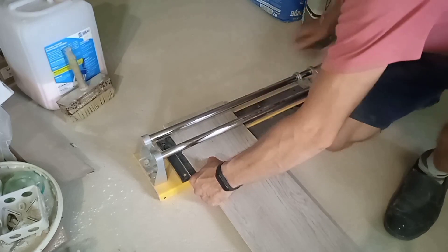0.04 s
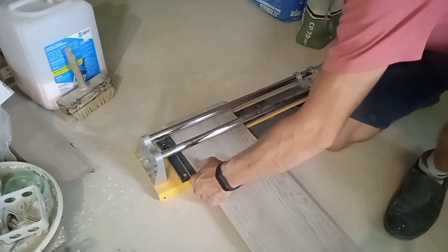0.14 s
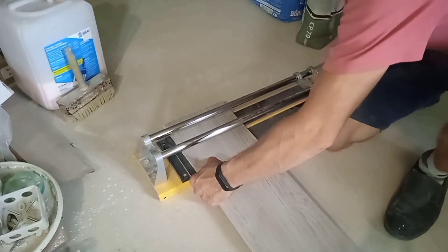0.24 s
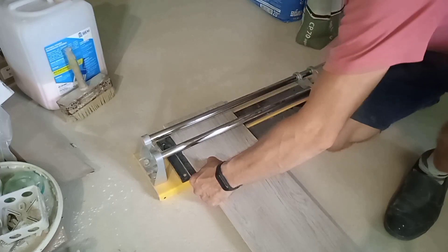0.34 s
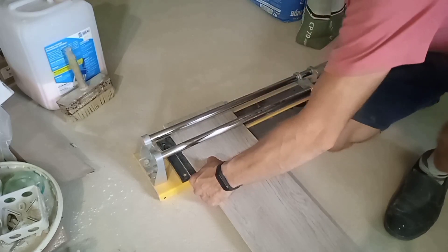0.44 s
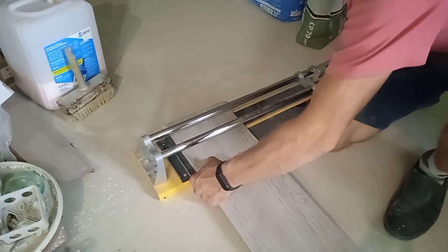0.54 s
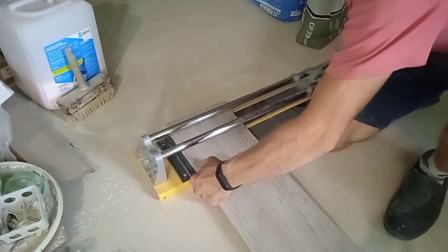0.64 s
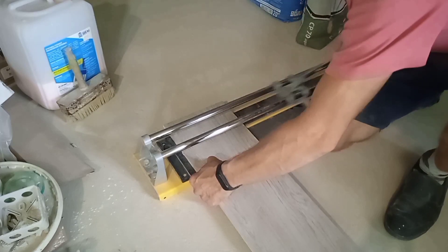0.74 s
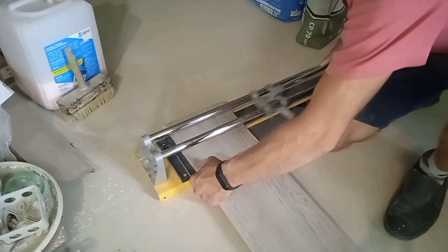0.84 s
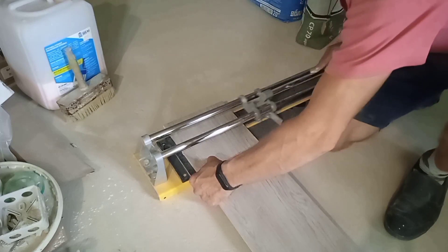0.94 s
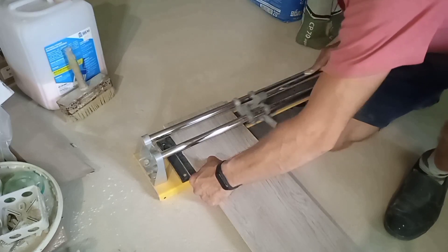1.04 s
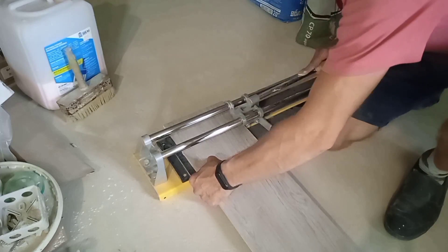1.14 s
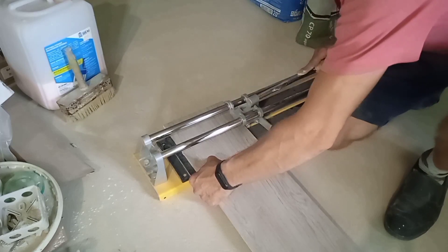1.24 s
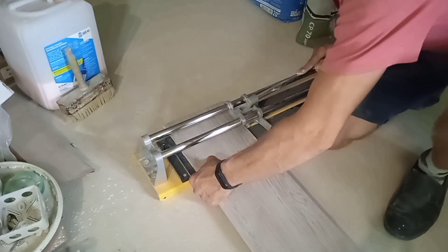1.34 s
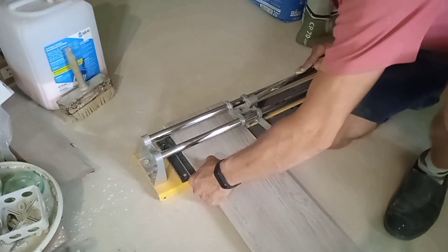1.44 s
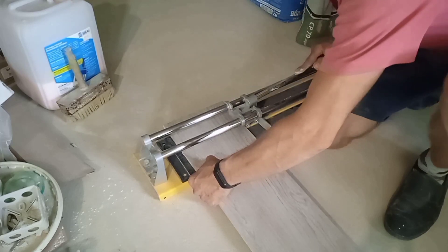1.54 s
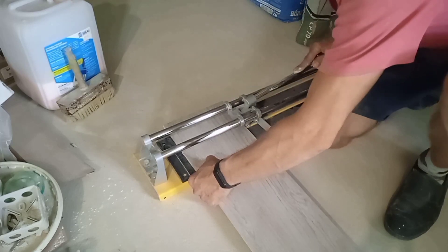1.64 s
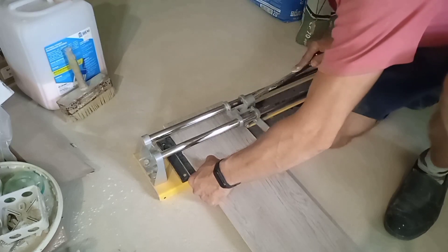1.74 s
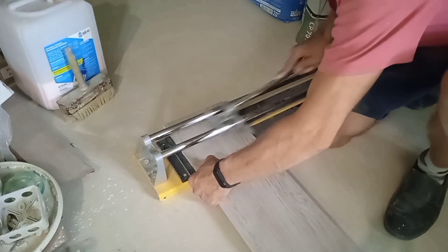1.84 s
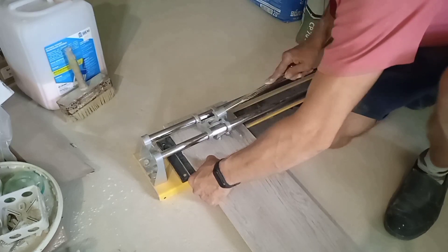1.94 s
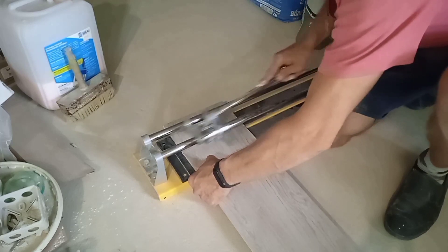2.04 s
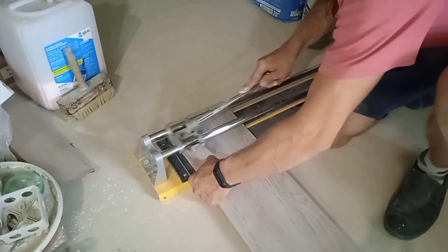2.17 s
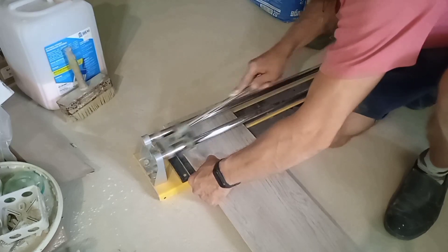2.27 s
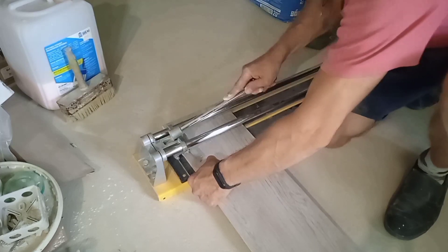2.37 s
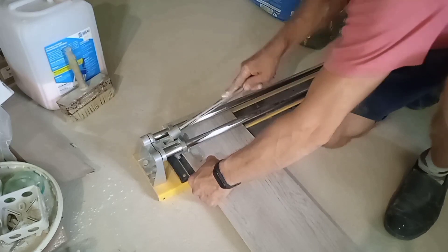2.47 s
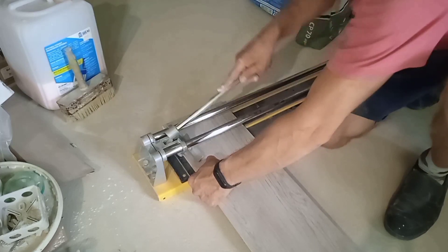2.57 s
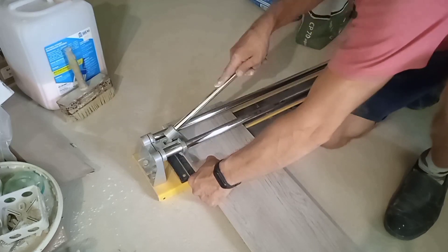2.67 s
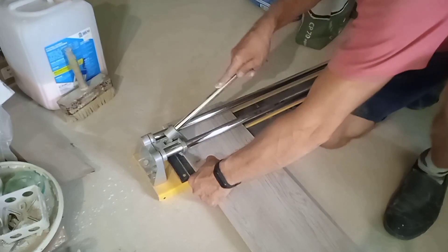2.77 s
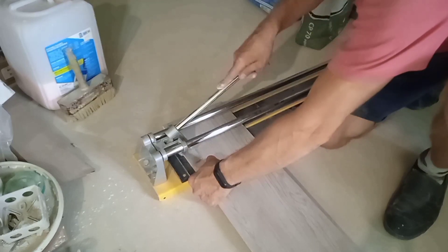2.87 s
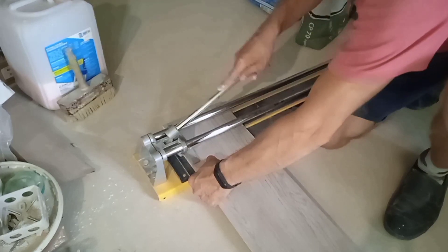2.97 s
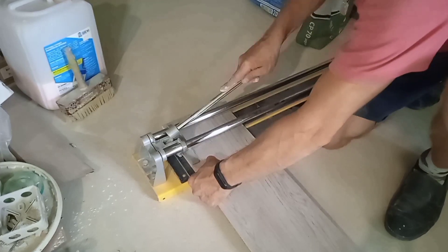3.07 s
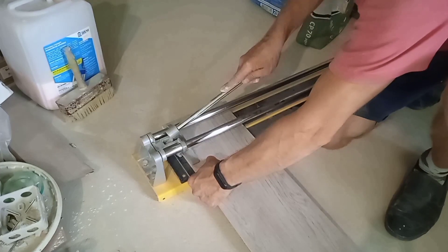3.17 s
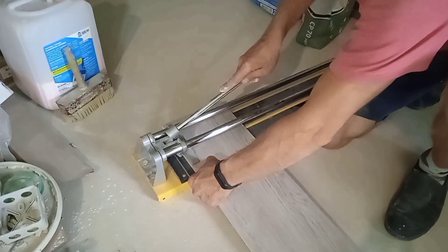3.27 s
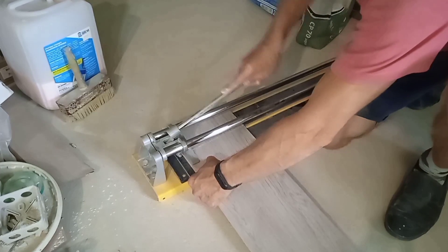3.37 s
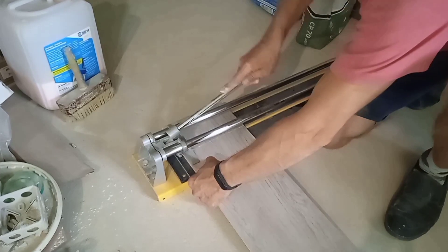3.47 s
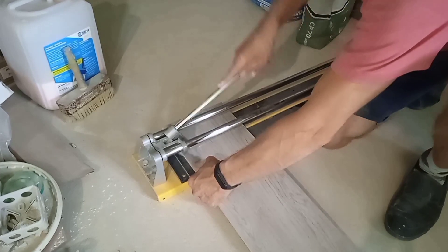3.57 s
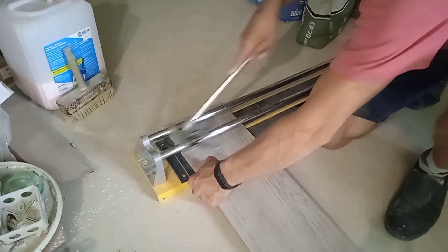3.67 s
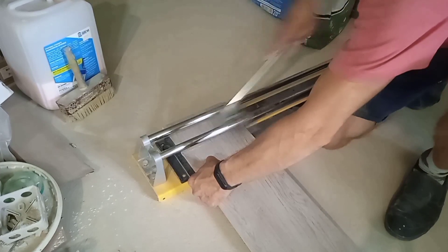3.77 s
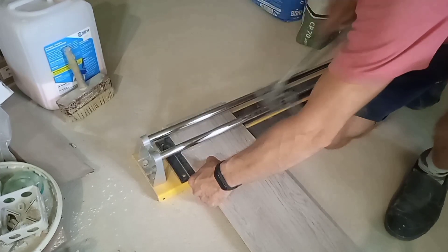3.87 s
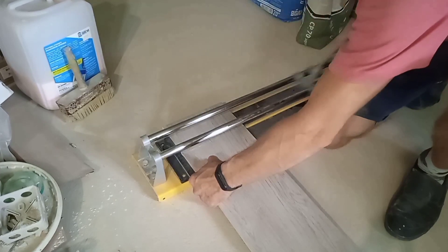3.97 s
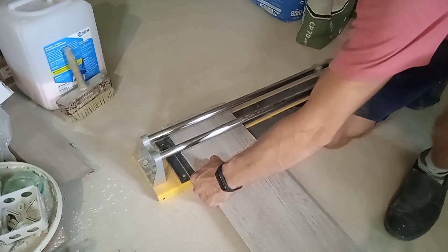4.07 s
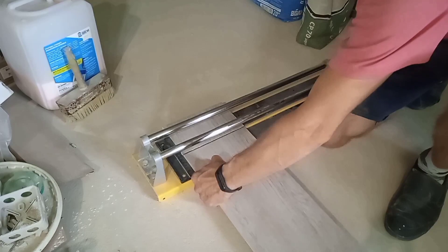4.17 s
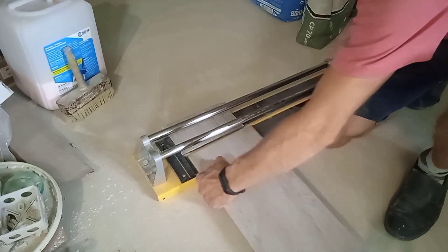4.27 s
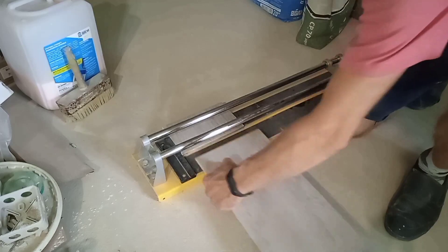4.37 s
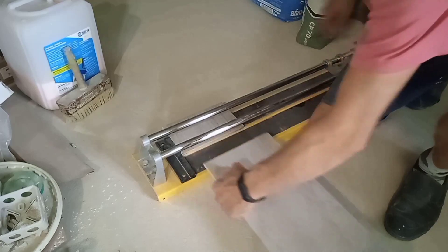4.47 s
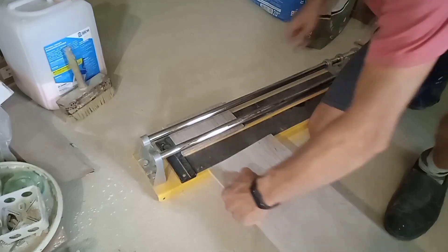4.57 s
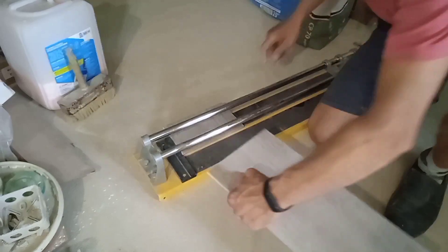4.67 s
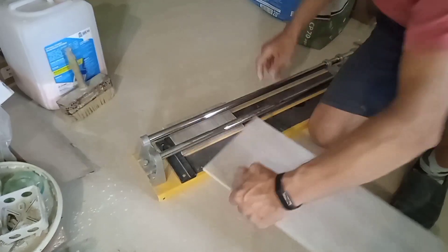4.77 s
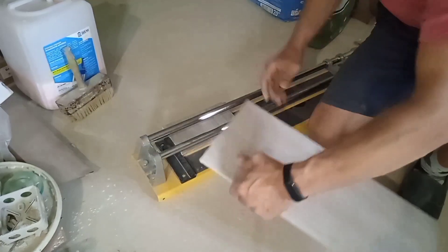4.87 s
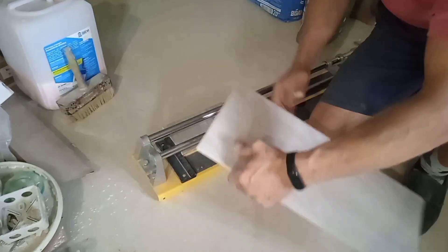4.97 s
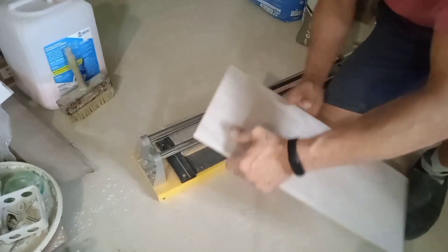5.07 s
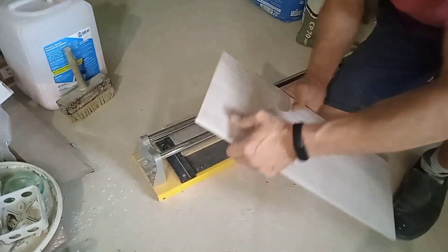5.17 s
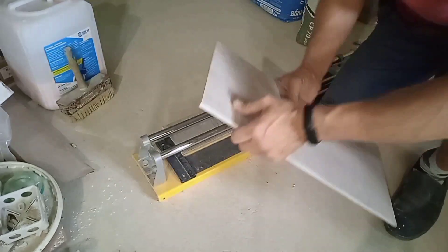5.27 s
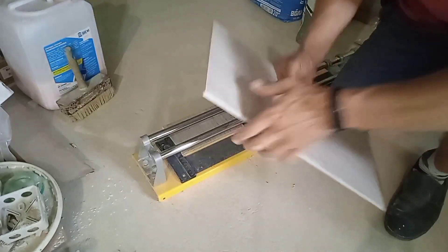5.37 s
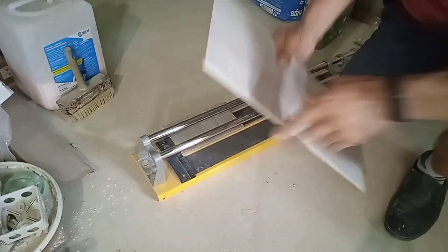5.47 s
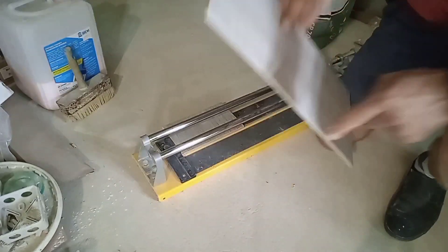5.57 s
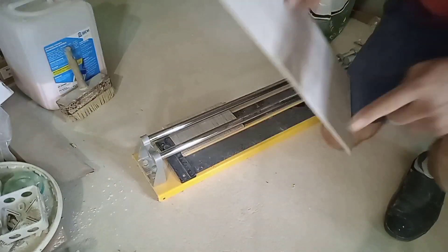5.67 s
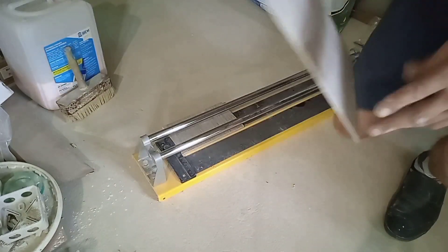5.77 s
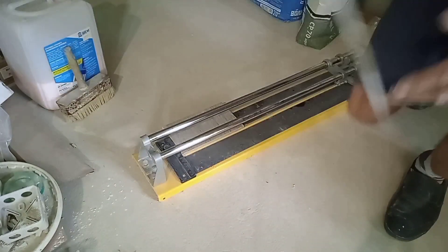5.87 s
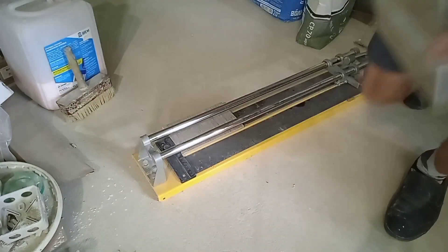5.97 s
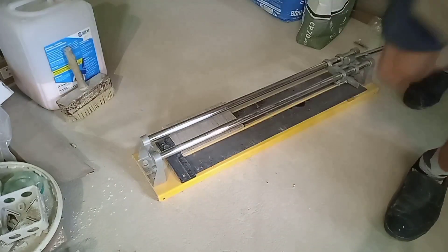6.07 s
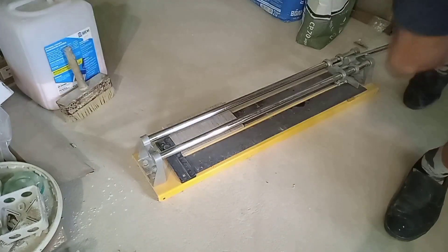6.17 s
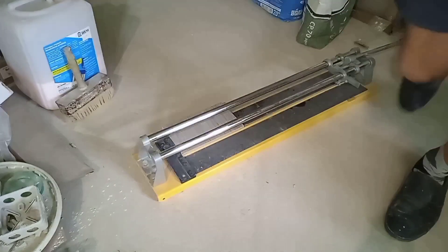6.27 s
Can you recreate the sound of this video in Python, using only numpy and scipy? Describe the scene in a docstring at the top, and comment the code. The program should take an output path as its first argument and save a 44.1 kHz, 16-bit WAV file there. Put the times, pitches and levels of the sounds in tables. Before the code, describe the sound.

In a bare, reverberant room, fingers bump and tick close to the microphone while a cutter carriage faintly rubs along steel rails. A metallic knock starts a short, harsh, gritty scrape as the wheel scores a tile, ending in a clack and tiny squeak. After a pause the tile snaps sharply and rings. The carriage slides back with faint whine and clinks, then soft handling over quiet air noise.

```python
"""A hand tile cutter scores and snaps a tile on the floor of a bare, ringing room.
Its carriage rubs and knocks along steel rails, shaped from filtered noise and dying sine waves.
The wheel scores the tile with a rain of tiny chips and squeaks; then the tile cracks and rings.
Fingers tick and bump close to the microphone, a grip shifts, and quiet air noise with a low drone runs on.
Levels in the tables are starting levels: scene() mixes them and record() colours the result."""
import sys
import numpy as np
from scipy import signal
from scipy.fft import rfft, irfft
from scipy.io import wavfile
from scipy.ndimage import uniform_filter1d

SR = 44100
rng = np.random.default_rng(int(sys.argv[2]) if len(sys.argv) > 2 else 0)


def dump_mix(stems):
    """Bounce the given channels to the path in sys.argv[1] as a 16-bit WAV at rate SR."""
    frames = np.atleast_2d(stems).T  # one column per channel
    limited = np.clip(frames, -1, 1)  # hard clip at full scale
    pcm = np.round(limited * 32767).astype(np.int16)
    wavfile.write(sys.argv[1], SR, pcm)


N = 278893  # length in samples


def amp(db):
    """Turns decibels into gain."""
    return 10 ** (np.asarray(db) / 20)


def unit(x):
    """Scales a sound to energy 1."""
    return x / np.sqrt(np.sum(x ** 2) + 1e-20)


def read(points, hz):
    """Reads a table of (Hz, value) between its rows, on a log-frequency axis."""
    f, value = np.transpose(points)
    return np.interp(np.log(hz + 1), np.log(f + 1), value)


def add(mix, s, sound):
    """Mixes a sound in at time s in seconds."""
    part = mix[round(s * SR):][:len(sound)]
    part += sound[:len(part)]


def since(s):
    """Seconds since time s, for every sample."""
    return np.arange(N) / SR - s


def swell(middle_s, half_length_s):
    """A smooth bell of height 1."""
    return np.exp(-(since(middle_s) / half_length_s) ** 2)


def drift(rate_hz):
    """Random wandering of rms 1, smoothed so that it moves up to about the given rate."""
    hz = np.fft.rfftfreq(N, 1 / SR)
    smooth = irfft(rfft(rng.standard_normal(N)) * np.exp(-(hz / rate_hz) ** 2), N)
    return unit(smooth) * np.sqrt(N)


def friction(hz, width):
    """Random slips heard through one resonance, rms 1; centre and width in Hz."""
    r = np.exp(-np.pi * width / SR)
    resonance = [1, -2 * r * np.cos(2 * np.pi * hz / SR), r * r]
    slips = signal.lfilter([1, 0, -1], resonance, rng.standard_normal(N))
    return unit(slips) * np.sqrt(N)


def causal(gain):
    """The most compact causal response that has this gain around the full frequency circle."""
    return np.fft.ifft(np.exp(np.conj(signal.hilbert(np.log(gain + 1e-9))))).real


def colour(points, tilt_db=0, size=2048):
    """A short response of energy 1 with the table's spectrum, tilted in dB per octave."""
    hz = abs(np.fft.fftfreq(size, 1 / SR))
    octaves = np.log2(np.clip(hz, 700, 9000) / 2000)
    return unit(causal(amp(read(points, hz) + tilt_db * octaves)))


def ring(modes, split=.0012, rise_cycles=0.16, count=2):
    """A sum of dying sines; with count above 1 each mode is a cluster of close partials that beat."""
    t = np.arange(SR * 3 // 4) / SR
    out = np.zeros(len(t))
    for hz, db, t60 in modes:
        partials = hz * (1 + split * rng.uniform(-1.05, 1, count))
        phases = rng.random((count, 1))  # in turns
        waves = np.sin(2 * np.pi * (np.outer(partials, t) + phases)).sum(0)
        rise = 1 - np.exp(-t * hz / rise_cycles)
        decay = np.exp(-np.log(1000) * t / t60)  # down 60 dB after t60
        out += amp(db) * unit(waves * rise * decay)
    return out


def rattle(length, size=4096):
    """A quick dying run of micro-contacts; its spectrum is evened out before a last fade."""
    fade = np.exp(-np.arange(size) / SR / length)
    z = rfft(rng.standard_normal(size) * fade)
    even = irfft(z / (abs(z) + 1e-12))
    return unit(even * np.sqrt(fade))


def blow(db, length, body, modes):
    """A rattle excites a broad body and its ringing modes; db is the rms over 50 ms."""
    response = modes.copy()
    add(response, 0, body)
    return amp(db) * np.sqrt(SR / 20) * unit(signal.fftconvolve(rattle(length), response))


def touches(rows, rise_cycles):
    """Dull, heavily damped pings of a hand-held case."""
    out, t = np.zeros(N), np.arange(SR // 4) / SR
    for s, db, hz, t60 in rows:
        shape = (1 - np.exp(-t * hz / rise_cycles)) * np.exp(-np.log(1000) * t / t60)
        add(out, s, amp(db) * np.sin(2 * np.pi * hz * t) * shape / shape.max())
    return out


# Colour of the steady air noise. Each row: frequency in Hz, relative strength in dB per Hz.
AIR_COLOUR = [(15, -56.5), (25, -34.5), (36, -18.5), (86, -6), (235, -12), (342, -12.5), (620, -17.5),
              (749, -18.5), (1280, -22.5), (1470, -22), (1870, -23), (2890, -27), (3490, -28),
              (8270, -43.5), (15800, -47.5)]
AIR_DB = -64
# the low drone wavers, and swells once
DRONE_HZ, DRONE_WIDTH_HZ, DRONE_DB, DRONE_WAVER_DB = 88, 21, -76, 3
DRONE_SWELL_S, DRONE_SWELL_LENGTH_S, DRONE_SWELL_DB = 5.71, 0.21, 14


def hush():
    """Coloured noise for room air and microphone hiss, plus a low drone of narrow noise."""
    hz = np.fft.rfftfreq(N, 1 / SR)
    air = irfft(rfft(rng.standard_normal(N)) * amp(read(AIR_COLOUR, hz)), N)
    drone_swell_db = DRONE_SWELL_DB * swell(DRONE_SWELL_S, DRONE_SWELL_LENGTH_S)
    drone_db = DRONE_DB + DRONE_WAVER_DB * drift(2) + drone_swell_db
    drone = friction(DRONE_HZ, DRONE_WIDTH_HZ) * amp(drone_db)
    return amp(AIR_DB) * unit(air) * np.sqrt(N) + drone


# Soft bumps of the hand. Each row: start in seconds, peak in dB, pitch in Hz, seconds to fall 60 dB.
HAND_BUMPS = [(.076, -45, 112, .1), (.251, -45.5, 356, .052), (.489, -45, 200, .016),
              (.545, -37, 141, .045), (.605, -57, 110, .1), (.985, -52, 137, 0.14),
              (1.81, -46.5, 110, .075), (1.846, -35, 598, .0088), (2.247, -42.5, 260, .025),
              (2.65, -42, 148, .032), (2.675, -44, 113, .026), (2.952, -50, 126, .2)]


def bumps():
    """The hand bumps softly: mostly low pings that die quickly."""
    return touches(HAND_BUMPS, rise_cycles=0.187)


# Ringing of the steel rails. Each row: pitch in Hz, energy in dB, seconds to fall 60 dB.
RAIL_MODES = [(250, -23.5, .35), (1260, -10, 0.25), (1406, -23, .3), (2250, -20, .3), (2273, -25.5, 0.13),
              (2826, -14, 0.22), (3130, -9, .15), (3410, -23, 0.22), (4620, -27.5, 0.33),
              (5050, -25.5, 0.26), (5570, -23, 0.39), (6330, -10.5, 0.405), (6370, -26, 0.34),
              (7230, -18.5, 0.64), (9060, -15, 0.29), (10200, -29, 0.23), (13930, -41, 0.359)]


def rail_ring():
    """Struck rails ring in many pitches, each a pair of close partials that beat."""
    return ring(RAIL_MODES)


# Short clinking of the lever. Each row: pitch in Hz, energy in dB, seconds to fall 60 dB.
LEVER_MODES = [(4940, -7, 0.011), (6080, -10, 0.021), (7060, -7.5, .015), (7880, -16, .015),
               (8600, -20.5, .015)]


def lever_ring():
    """The lever clinks in a few high pitches that die within hundredths of a second."""
    return ring(LEVER_MODES, count=1)


# Broad colour of the cutter's frame. Each row: frequency in Hz, relative strength in dB per Hz.
FRAME_COLOUR = [(53, -51), (90, -8.5), (188, -16.5), (228, -5), (296, -7.5), (578, -1.5), (1150, -5.5),
                (1340, -1.5), (1630, -5), (2110, -4), (4130, -12.5), (5970, -11.5), (9010, -27.5),
                (9610, -35.5), (15800, -42.5)]
# The carriage knocks against rails, tile edge and end stops; the row at 0.547 s is a faint knock # that lends
# the finger tick at 0.543 s its ring in the room. Each row: start in seconds, level in dB, # rattle length in
# seconds, brightness in dB per octave.
CARRIAGE_CLUNKS = [(0.2486, -59, 0.00072, 0), (0.277, -56, 0.0047, -16), (0.547, -58.5, 0.0043, -4.5),
                   (0.6746, -55.5, 0.0052, -5), (0.729, -52, 0.018, -5.5), (1.9174, -30.5, 0.0021, 1.5),
                   (2.398, -38.5, .012, -3.5), (2.4114, -29, 0.0079, 2), (3.109, -55, 0.0047, 1.5),
                   (4.197, -60, 0.004, -2.5), (4.379, -50.5, 0.11, -2), (4.4544, -34.5, 0.0066, 2.5),
                   (4.467, -37.5, 0.014, -3.5)]
# the rails' share at a hard knock, and how many dB that share changes per dB of force
HARD_KNOCK_DB, RAIL_RING_DB, RING_GROWTH = -35.5, -10, .55
CLUNK_LEVER_DB = -14.5


def clunks(steel, lever):
    """Metal parts meet: frame, rails and lever sound, and harder knocks ring the rails more."""
    out = np.zeros(N)
    for s, db, length, tilt_db in CARRIAGE_CLUNKS:
        rail_db = RAIL_RING_DB + RING_GROWTH * (db - HARD_KNOCK_DB)
        modes = amp(rail_db) * steel + amp(CLUNK_LEVER_DB) * lever
        add(out, s, blow(db, length, colour(FRAME_COLOUR, tilt_db), modes))
    return out


# Dry ticks close to the microphone. Each row: start in seconds, peak in dB, pitch in Hz,
# seconds to fall 60 dB.
FINGER_TICKS = [(.523, -41, 1720, 0.011), (.543, -26.5, 1270, 0.0011), (4.0513, -43.5, 1770, 0.02),
                (4.057, -52, 4330, 0.0067), (5.232, -35.5, 4000, 0.0085), (5.7908, -48, 1702, .019)]


def ticks():
    """Fingers tick: short pings, higher than most of the bumps."""
    return touches(FINGER_TICKS, rise_cycles=0.22)


# Pulls of the carriage back along the rails. Each row: start in seconds, length in seconds,
# rub level in dB, whine level in dB, whine pitch in Hz at top speed.
CARRIAGE_PULLS = [(0.669, 0.69, -62, -83, 3640), (3.575, .42, -60.5, -71, 3950),
                  (3.987, 0.4, -64, -71.5, 3775)]
PULL_PEAK = 0.27  # share of a pull after which the carriage is fastest
RUB_GROWTH = 0.57  # the rub's gain goes with speed to this power
WHINE_SLOW_HZ = 3300
# the bushings whistle as the carriage first breaks free
WHISTLE_S, WHISTLE_DB, WHISTLE_RISE_DB_PER_S, WHISTLE_FALL_DB_PER_S = 0.724, -54.5, 695, 183


def speed(start, length):
    """Carriage speed 0-1 in one pull: it gathers quickly and runs out slowly."""
    progress = np.interp(since(start) / length, [0, PULL_PEAK, 1], [0, .5, 1])
    return np.maximum(np.sin(np.pi * progress), 0)


def whine(width_hz=45, waver=0.0043):
    """A dry bushing's fuzzy stick-slip tone rises and grows with the carriage's speed."""
    pitch, gain = WHINE_SLOW_HZ, 0
    for start, length, _, db, top_hz in CARRIAGE_PULLS:
        pace = speed(start, length)
        pitch = pitch + (top_hz - WHINE_SLOW_HZ) * pace
        gain = gain + amp(db) * pace
    turns = np.cumsum(pitch * (1 + waver * drift(40.7))) / SR
    return np.sqrt(2) * drift(width_hz) * np.sin(2 * np.pi * turns) * gain


def glide():
    """The bushings rub along the rails, louder with speed, whine, and whistle as they break free."""
    rub = friction(1570, 1340) + amp(-7.0) * friction(3400, 400)
    rub += amp(-17) * friction(7330, 300) + amp(-14.5) * friction(10220, 110)
    rubbing = sum(amp(db) * speed(start, length) ** RUB_GROWTH for start, length, db, _, _ in CARRIAGE_PULLS)
    flutter = amp(3.9 * drift(30) - 8)
    t = since(WHISTLE_S)
    whistling = amp(WHISTLE_DB + np.minimum(WHISTLE_RISE_DB_PER_S * t, -WHISTLE_FALL_DB_PER_S * t))
    return flutter * rub * rubbing + friction(5430, 270) * whistling + whine()


# Colour of the padded bed under the tile. Each row: frequency in Hz, relative strength in dB per Hz.
THUD_COLOUR = [(180, -30), (300, -9), (410, -17), (510, 0.5), (630, -7.5), (876, -3.5), (1100, -1),
               (1750, -7.5), (2200, -12.5), (4300, -25), (8300, -25), (10500, -43), (15800, -47.5)]
# Ringing of the bed. Each row: pitch in Hz, energy in dB, seconds to fall 60 dB.
BED_MODES = [(518.6, -3.5, 0.064), (963, -12, .16)]
# Wheel or breaker foot settles on the tile. Each row: start in seconds, level in dB,
# contact length in seconds, bed ring in dB.
TILE_THUDS = [(1.197, -42, 0.0054, -5.5), (1.229, -47, 0.0059, 8), (1.959, -37, 0.017, 3.5),
              (3.123, -52, .0053, -17), (3.136, -57, 0.017, 4)]


def thuds():
    """Wheel or breaker foot settles on the tile and thuds its padded bed."""
    out, bed = np.zeros(N), ring(BED_MODES, count=1)
    for s, db, length, bed_db in TILE_THUDS:
        add(out, s, blow(db, length, colour(THUD_COLOUR), amp(bed_db) * bed))
    return out


# The loose lever clinks in its pivot. Each row: start in seconds, level in dB.
LEVER_CLINKS = [(1.681, -65.5), (1.7783, -65.5), (1.8325, -56), (2.0857, -42), (3.681, -55.5),
                (4.07, -65.5), (4.1231, -59.5), (4.1634, -53.5), (4.402, -49.5)]
CLINK_LENGTH_S, CLINK_RAIL_DB, CLINK_LEVER_DB = 0.0011, -8.5, -2.5


def clinks(steel, lever):
    """The loose lever taps in its pivot: a very short rattle rings lever, rails and frame."""
    out = np.zeros(N)
    modes = amp(CLINK_RAIL_DB) * steel + amp(CLINK_LEVER_DB) * lever
    for s, db in LEVER_CLINKS:
        add(out, s, blow(db, CLINK_LENGTH_S, colour(FRAME_COLOUR), modes))
    return out


# the scoring stroke: pressure builds, the wheel bites, then eases along the tile until it is let go
BITE_S, LET_GO_S, STROKE_DB = 1.934, 2.46, -32
PRESS_DB_PER_S, EASE_DB_PER_S, RELEASE_DB_PER_S = 200.5, 11, 252
SKIP_FROM_S, SKIP_TO_S, SKIP_DB = 2.007, 2.073, -12.5  # the chipping briefly dips


def pressure():
    """Gain of the scoring stroke: press, bite, ease, release, with one short skip."""
    t = since(BITE_S)
    db = STROKE_DB + np.where(t < 0, PRESS_DB_PER_S * t, -EASE_DB_PER_S * t)
    skipping = (since(SKIP_FROM_S) > 0) & (since(SKIP_TO_S) < 0)
    release_db = RELEASE_DB_PER_S * np.maximum(since(LET_GO_S), 0)
    return amp(db - release_db + SKIP_DB * skipping)


# Broad colour of the scrape. Each row: frequency in Hz, relative strength in dB per Hz.
SCRAPE_COLOUR = [(88, -31.5), (150, -9), (297, -17.5), (575, 1.5), (955, -7), (1120, 0.5), (2080, -1.5),
                 (2480, -8), (2840, 2), (4120, -9), (7250, -3), (8470, -16.5), (13500, -18), (14900, -27),
                 (15800, -23.5)]
# Tones of the loaded wheel and its holder. Each row: pitch in Hz, relative energy in dB.
WHEEL_TONES = [(592.2, -66.5), (1265, -62.5), (1502, -77), (2132, -49.5), (2799, -44.5), (3542, -54),
               (4366, -55.5), (4727, -66), (5087, -62), (5534, -47.5), (5841, -62), (6304, -48.5),
               (7133, -52), (7219, -50), (7935, -65), (9135, -53.5), (9545, -62), (9959, -65), (11036, -59),
               (11440, -69.5), (12785, -77), (14680, -66), (14788, -65.5), (15310, -70)]


def scoring(chips_per_s=1100, spread_db=3.0, chatter_db=3.5, tones_db=-5.0, tones_t60=0.069, count=6):
    """Tiny chips of glaze burst under the chattering wheel and keep its holder ringing."""
    size_db = spread_db * np.minimum(rng.exponential(1, N), 3) + chatter_db * drift(100)
    size = amp(size_db) * rng.choice([-1, 1], N)
    bursts = size * (rng.random(N) < chips_per_s / SR)
    chips = unit(bursts) * np.sqrt(N) * pressure()
    # each place along the score feeds the modes differently and has its own echoes from the tile's edges
    place = np.interp(np.arange(N) / SR, [BITE_S, LET_GO_S], [0, count - 1])
    place = (place + rng.random(N)).astype(int)  # neighbouring places blend at random
    out, body = np.zeros(N), colour(SCRAPE_COLOUR)
    for k in range(count):
        edges = .6 * unit(rng.standard_normal(256) * np.linspace(1, 0, 256))
        edges[0] = 1  # the direct sound
        modes = [(hz, db + 2 * rng.standard_normal(), tones_t60) for hz, db in WHEEL_TONES]
        response = amp(tones_db) * unit(ring(modes, count=1))
        add(response, 0, unit(np.convolve(body, edges)))
        out += signal.oaconvolve(chips * (place == k), unit(response))[:N]
    return out


# The wheel squeaks at the tile's edge. Each row: start in seconds, length in seconds,
# start pitch in Hz, end pitch in Hz, level in dB.
WHEEL_SQUEAKS = [(2.369, 0.023, 3600, 3030, -33), (2.382, 0.0081, 7030, 5290, -22),
                 (2.382, 0.027, 3218, 2852, -31)]


def squeaks(rough=0.56):
    """Short stick-slip tones fall in pitch, with a fast random roughness in level."""
    out = np.zeros(N)
    for s, length, start_hz, end_hz, db in WHEEL_SQUEAKS:
        hz = np.linspace(start_hz, end_hz, int(length * SR))
        tone = np.sin(2 * np.pi * np.cumsum(hz) / SR)
        add(out, s, amp(db) * tone * np.hanning(len(hz)))
    return out * (1 + rough * drift(504.5))


# Broad colour of the snap. Each row: frequency in Hz, relative strength in dB per Hz.
SNAP_COLOUR = [(41, -54), (70, -42), (145, -7.5), (190, -42), (222, -17), (335, -8), (515, -2), (577, -8.5),
               (950, -7), (1160, -8.5), (1960, -5), (3050, -10.5), (3960, -18.5), (7310, -12.5),
               (10500, -34.5), (15800, -41)]
# Ringing of the tile. Each row: pitch in Hz, energy in dB, seconds to fall 60 dB.
TILE_MODES = [(232.3, -18, 0.16), (424, -14.5, 0.19), (511, -20, 0.36), (679, -13.5, 0.18),
              (890, -14, 0.18), (918, -17.5, 0.41), (1080, -19, .2), (1300, -19, 0.59), (1483, -10, 0.11),
              (1890, -16, 0.24), (2450, -43, 0.49), (3100, -18, 0.15), (4900, -33, .2), (6120, -16, 0.13),
              (6930, -11, 0.09), (7100, -56, 0.48), (7400, -11, 0.13)]
# The tile breaks and its halves slap the bed. Each row: start in seconds, level in dB,
# rattle length in seconds, brightness in dB per octave.
TILE_CRACKS = [(3.4423, -25.5, 0.0066, 0.32), (3.4532, -38.5, 0.00063, -4.5), (3.4628, -38, 0.0074, -5.5)]


def snap(foot_db=-11):
    """The breaker foot strikes, the crack runs along the score and the halves ring."""
    out, parts = np.zeros(N), ring(TILE_MODES) + amp(foot_db) * lever_ring()
    for s, db, length, tilt_db in TILE_CRACKS:
        add(out, s, blow(db, length, colour(SNAP_COLOUR, tilt_db), parts))
    return out


# The hand shifts its grip on the lifted piece. Each row: middle in seconds, half length in seconds,
# level in dB.
GRIP_SHIFTS = [(5.085, 0.098, -66), (5.446, .09, -69), (5.79, 0.057, -62)]


def lift():
    """Skin shifts in little jerks on the lifted piece: narrow noise that flutters in level."""
    gripping = sum(amp(db) * swell(s, half_length) for s, half_length, db in GRIP_SHIFTS)
    skin = friction(1500, 180) + amp(-7) * friction(3000, 520)
    return skin * amp(3.4 * drift(15) - 7.5) * gripping


# How long the room rings. Each row: frequency in Hz, seconds to fall 60 dB.
ROOM_DECAY = [(80, 0.89), (250, 0.62), (700, 0.61), (2500, 0.68), (5000, 0.65), (8000, 0.51), (11000, 0.4),
              (15000, 0.35)]


def room(x, build_s=0.00093, early_db=2.5, early_s=0.0065, size=4096):
    """Bare walls: dense reflections, boosted early on, each band dying at its own speed."""
    taps = rng.standard_normal(SR) * (rng.random(SR) < 5000 / SR)  # about 5000 reflections a second
    hz, t, z = signal.stft(taps, SR, nperseg=256)
    decay = np.exp(-np.log(1000) * t / read(ROOM_DECAY, hz)[:, None])
    tail = signal.istft(z * decay, SR, nperseg=256)[1][:SR]
    t = np.arange(SR) / SR
    tail = tail * (1 - np.exp(-t / build_s)) * amp(early_db * np.exp(-t / early_s))
    # a diffuse field favours no band: even out the energy over every 70 Hz
    power = uniform_filter1d(abs(np.fft.fft(tail, 16 * size)) ** 2, 104, mode="wrap")[::16]
    tail = signal.fftconvolve(tail, causal(1 / np.sqrt(power)))
    return signal.fftconvolve(x, unit(tail))[:N]


def scene():
    """The cutter is heard directly and through the room; touches at the microphone barely wake the room."""
    steel, lever = rail_ring(), lever_ring()
    hits = clunks(steel, lever) + clinks(steel, lever) + thuds()
    crack, squeal = snap(), squeaks()
    rubbing = scoring() + glide() + lift()
    tick, bump = ticks(), bumps()
    direct = amp(-9.0) * hits + amp(-6.0) * rubbing + amp(-9.0) * crack + amp(3.0) * squeal + tick + bump
    to_room = hits + crack + rubbing + amp(3.5) * squeal + amp(-16) * tick + amp(-6.0) * bump
    walls = amp(-1.56) * room(to_room)
    return np.tile(direct + walls + hush(), (2, 1))  # the same sound on both channels


def record(dry, port_hz=15000, port_width=550, port_db=13.5, low_cut_hz=48, edge_hz=15650):
    """The microphone sheds deep bass and its port boosts the top of the band; then the band limit."""
    hz = np.fft.rfftfreq(N, 1 / SR)
    port = amp(port_db * np.exp(-((hz - port_hz) / port_width) ** 2))
    heard = irfft(rfft(dry) * port, N)
    heard = signal.sosfilt(signal.butter(3, low_cut_hz, "highpass", fs=SR, output="sos"), heard)
    band_limit = signal.firwin(511, edge_hz, window=("kaiser", 9), fs=SR)
    return signal.oaconvolve(heard, band_limit[None], "same")


dry = scene()
out = record(dry)
dump_mix(out)
```